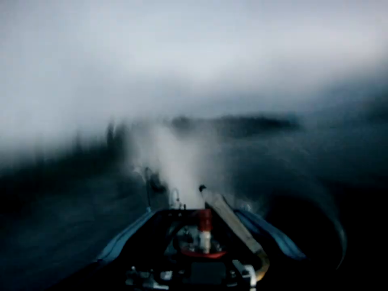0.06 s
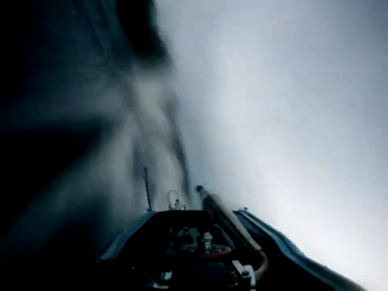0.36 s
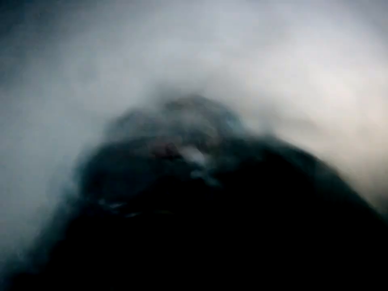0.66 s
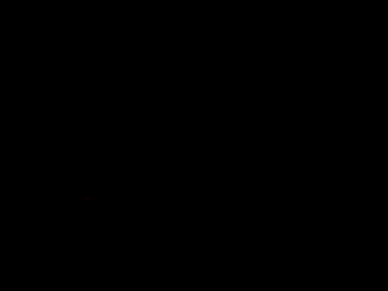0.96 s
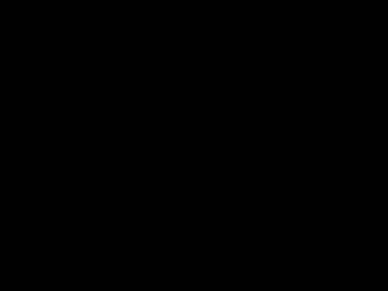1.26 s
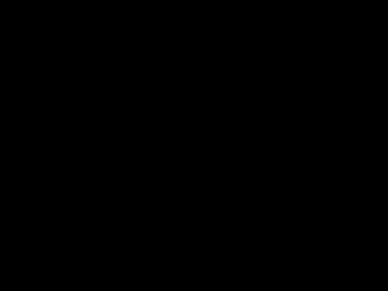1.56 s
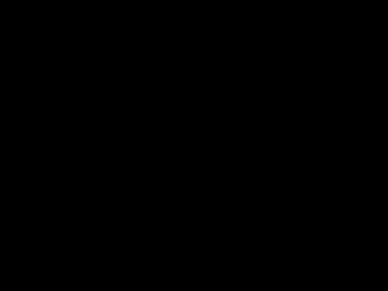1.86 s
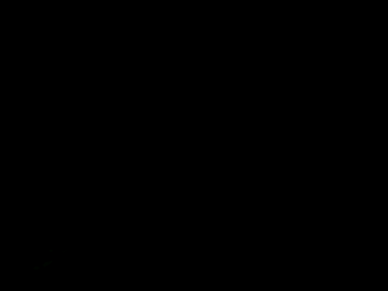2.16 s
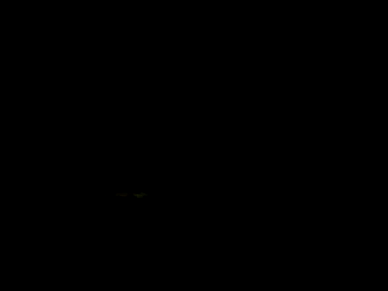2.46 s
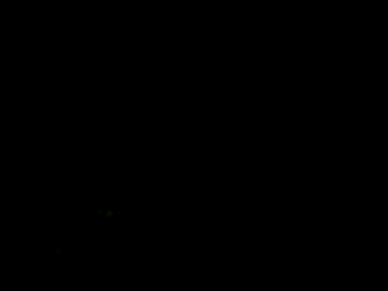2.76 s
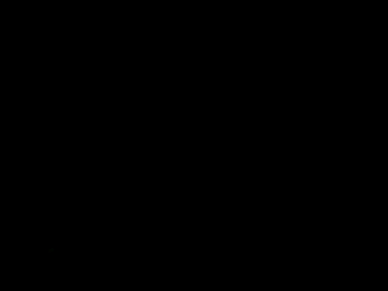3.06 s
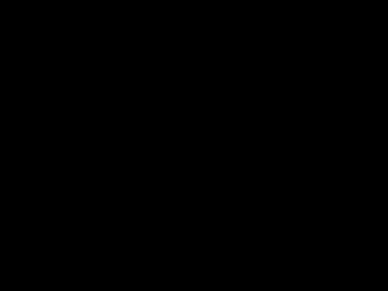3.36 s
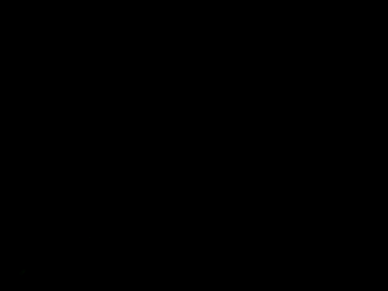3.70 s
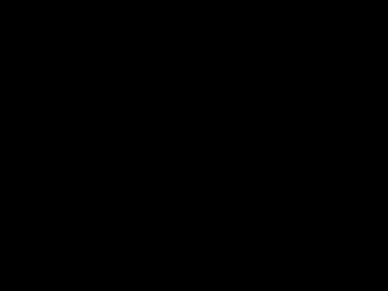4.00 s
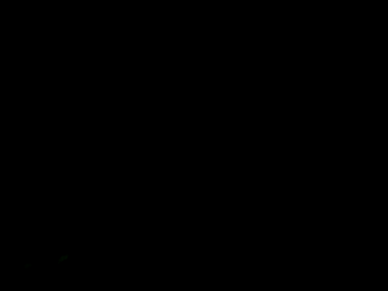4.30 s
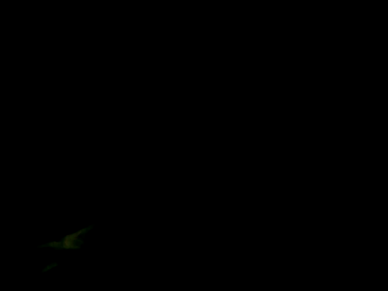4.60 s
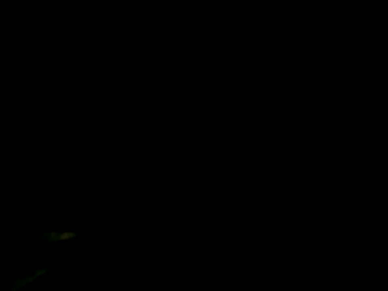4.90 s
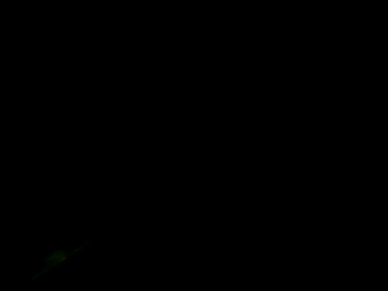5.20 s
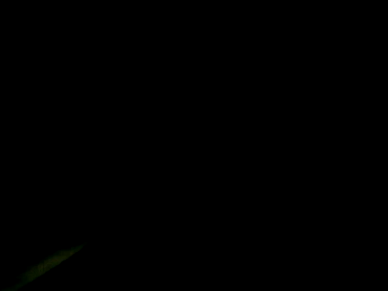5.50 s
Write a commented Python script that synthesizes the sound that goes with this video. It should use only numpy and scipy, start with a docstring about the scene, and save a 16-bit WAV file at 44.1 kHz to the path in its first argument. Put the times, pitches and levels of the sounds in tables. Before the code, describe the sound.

A racing boat's engine screams at full throttle, rising in pitch, heard from a camera in a sealed case on deck. After half a second the boat plunges and the engine is smothered and runs down. Water slaps and cracks against the case over a rumbling, fizzing rush. Under water, a hollow cloud of bubbles swells and fades, thinning to faint single gulps and a few tiny ticks.

```python
"""A racing boat's engine screams at full throttle, heard by a camera in a sealed case on deck.
Its firing pulses bark through the exhaust pipe until the boat trips and plunges: the hull slams down
and the revs die as water floods over it. Under water a cloud of air churns, hums and fizzes,
then thins out to single gulps and slow wobbles of trapped air."""
import sys
import numpy as np
from scipy import signal
from scipy.fft import rfft, irfft, next_fast_len
from scipy.io import wavfile

SR = 44100
rng = np.random.default_rng(int(sys.argv[2]) if len(sys.argv) > 2 else 0)


def inscribe(sig):
    """Save sig as 16-bit PCM at rate SR to the path in sys.argv[1].

    A 1-D sig is mono; a 2-D sig holds one channel per row.
    Samples are clipped to [-1, 1] before scaling.
    """
    pcm = np.round(np.clip(np.atleast_2d(sig).T, -1, 1) * 32767)
    wavfile.write(sys.argv[1], SR, pcm.astype(np.int16))


N = 249165
TIME = np.arange(N) / SR

# tone colour of the exhaust pipe: f/Hz, level/dB
PIPE_EQ = [(80, 5), (170, -4.5), (275, 0), (310, -12), (355, 4), (550, -2), (720, 2), (850, 2), (1070, 2),
           (1400, -6.5), (1750, -8), (2100, -11), (2500, -24.5), (2900, -29), (3600, -30), (5000, -46.5)]
def engine(jitter=.048, flutter_db=7, half_order_db=-17, harmonics=16):
    """Firing pulses ring through the pipe; uneven firings smear the overtones and puff out rasp."""
    hz, db, rough, bright = throttle()
    firings = np.cumsum(hz * (1 + jitter * rough * wander(140))) / SR
    running = hz > 24
    phase = 2 * np.pi * firings[running]
    tone, power, flutter = np.zeros(N), np.zeros(N), wander(23.54)
    for k in range(1, harmonics + 1):
        flicker = flutter_db * rough[running] * np.roll(flutter, k * N // harmonics)[running]
        level = gain_of(eq_at(PIPE_EQ, k * hz[running]) + bright[running] * np.log2(k / 3) + flicker)
        overtone = np.cos(k * phase + np.pi * k * k / 4)  # the pipe spreads each pulse in time
        growl = gain_of(half_order_db) * np.cos((k - .5) * phase + k * k)  # strong, weak firings by turns
        tone[running] += level * (overtone + growl)
        power[running] += level ** 2 / 2
    scream = tone / np.sqrt(power + 1e-12) * np.sqrt(1 - np.clip(rough, 0, .95) ** 2)
    puffs = (.69 + np.exp(-(firings % 1) / .27)) * rng.standard_normal(N)
    rasp = coloured(puffs, [(100, -19.5), (300, -5), (550, -2.5), (1100, .5), (1700, 3.5), (2200, -6.5),
                            (2800, -20.5), (3600, -25), (5500, -28)])
    return running * gain_of(db) * (scream + rough * rasp)


# firing rate at full throttle, climbing as the propeller leaves the water: t/s, f/Hz
FIRING_RATE = [(0.0, 265.7), (0.054, 270), (0.102, 288.4), (0.162, 273.6), (0.22, 274.9), (0.258, 296.5),
               (0.366, 335.1), (0.43, 355.7), (0.525, 357.7)]
# wave crests that make the exhaust bark: t/s, boost/dB, added roughness
WAVE_CRESTS = [(0.102, 2.5, 0.026), (0.249, 3.5, -0.14), (.378, 2.5, 0.22), (0.426, 3.5, -0.13)]
def throttle(plunge_s=.522, smother_s=.025, run_down_s=.78, stall_hz=96, crest_s=.017):
    """Engine pitch, level, roughness and brightness: it clears as it races, then drowns and runs down."""
    since = np.maximum(TIME - plunge_s, 0)
    hz = curves(FIRING_RATE)[0] * np.cos(np.pi / 2 * np.minimum(since / run_down_s, 1)) ** 2
    under = np.minimum(since / smother_s, 1)

    def morph(biting, free, drowned):
        """Blends from propeller biting to spinning free, then to the smothered exhaust."""
        return (1 - under) * np.interp(hz, [273, 359], [biting, free]) + under * drowned

    db = morph(-14.5, -13.5, -24)
    rough = morph(.46, .31, .37)
    bright = morph(.85, 3.5, -3.2)  # dB per octave
    for s, boost_db, added_rough in WAVE_CRESTS:
        crest = np.exp(-((TIME - s) / crest_s) ** 2)
        db += boost_db * crest
        rough += added_rough * crest
    stall_db = 40 * np.log10(np.clip(hz / stall_hz, .01, 1))
    return hz, db + stall_db, rough, bright


# water and hull striking the case: t/s, level/dB, ring f/Hz, crack send/dB, t60/s
HULL_HITS = [(0.5648, 2, 2088, -5.5, 0.023), (0.5759, 0, 2150, -9.5, .042),
             (0.599, -4.5, 1444, -18.5, 0.036), (0.6748, -1.5, 2050, -8.5, .035),
             (.6822, -6.5, 962, -33, .03), (0.814, -7, 1170, -7, .03), (0.9217, -2, 2019, -2, 0.012),
             (1.0134, -17.5, 2130, 1, 0.049), (1.2668, -5.5, 1380, -43, 0.042),
             (1.303, -5.5, 1135, -33, 0.02), (1.3345, -2.5, 1250, -40, 0.014),
             (1.3708, -5.5, 2150, -7, 0.036), (1.392, -0.5, 1874, -2.5, 0.015),
             (1.4268, 7, 2043, -23.5, .015), (1.5438, -9.5, 1590, -1.5, 0.077),
             (1.5851, -12, 2103, -10, 0.087), (1.6361, -5.5, 2140, -26, 0.021),
             (1.6635, -12, 1960, -11, 0.05), (1.6939, -2.5, 1477, -6.5, .055),
             (2.383, -20, 1270, -23, 0.047), (2.428, -21.5, 1240, -45, 0.054),
             (2.8154, -14.5, 2126, -47, 0.03), (3.8497, -28, 1670, -35, 0.02),
             (4.6178, -25, 1890, -29, 0.016), (4.6516, -36.5, 1480, -12, 0.022),
             (4.8492, -36.5, 2040, -31, 0.018)]
def slaps(spray_db=-1, crack_db=5):
    """Each hit layers a sharp crack, a puff of spray and a short ring of squeezed air."""
    out, t = np.zeros(N), np.arange(4096) / SR
    spray_eq = [(150, -5), (500, -5.5), (1200, -2.5), (2200, -.5), (3000, -23), (5500, -26.5), (7000, -46)]
    crack_eq = [(1500, -31), (2800, -3), (3700, 20.5), (4600, -.5), (5500, -7), (7000, -42)]
    for s, db, hz, send_db, t60 in HULL_HITS:
        ring_db = -9.5 - .01 * send_db  # a softer crack traps more air and rings a little more
        air = gain_of(ring_db) * bubble(t, hz, t60, rise_s=.0033, glide=.28)
        spray = gain_of(spray_db) * burst(t, spray_eq, t60, rise_s=.0011)
        crack = gain_of(send_db + crack_db) * burst(t, crack_eq, .42 * t60, rise_s=.0006)
        add(out, s, gain_of(db) * (air + spray + crack))
    return out


# faders for the water rushing over the case: t/s, rumble/dB, churn/dB, fizz/dB
RUSH_FADERS = [(.55, -36.5, -18, -17), (.62, -28.5, -21.5, -33), (.71, -21.5, -21, -31),
               (.88, -54.5, -33, -28), (1.01, -17.5, -20.5, -23), (1.14, -37.5, -31, -31.5),
               (1.36, -40, -23.5, -26), (1.6, -31, -23.5, -32), (1.77, -30.5, -27.5, -44.5)]
# spray turning to separate bubbles, then blurring again: t/s, share of smooth hiss/0-1
FIZZ_BLUR = [(.55, 0.85), (1.15, 0.59), (1.3, 0.55), (1.7, 0.31), (2.0, 0.8), (3.5, 0.56)]
# low rumble of the flood: f/Hz, level/dB
RUMBLE_EQ = [(10, -9.5), (28, -2), (50, 4.5), (80, -7.5), (120, -7), (220, -28), (500, -69.5)]
# big bubbles near the surface: f/Hz, level/dB
CHURN_NEAR_EQ = [(60, -24), (130, -5.5), (250, -2), (350, -4.5), (500, -2.5), (700, -8.5), (950, -9.5),
                 (1400, -19), (3000, -65)]
# big bubbles at depth, more hollow: f/Hz, level/dB
CHURN_DEEP_EQ = [(60, -37), (130, -8.5), (200, 1.5), (260, -7), (380, -6), (520, 1), (590, -3.5), (670, 0),
                 (800, -9), (950, -30), (1400, -4.5), (3000, -61)]
# small bubbles near the surface: f/Hz, level/dB
FIZZ_NEAR_EQ = [(500, -24), (950, -9.5), (1300, -1.5), (1700, -2), (2150, 2), (2600, -6.5), (3100, -8),
                (3600, -7), (4300, -22), (5500, -14.5), (7000, -39)]
# small bubbles at depth, darker: f/Hz, level/dB
FIZZ_DEEP_EQ = [(500, -13), (950, -4.5), (1300, 4), (1700, -1), (2150, 2.5), (2600, -12), (3100, -12.5),
                (3600, -9.5), (4300, -20), (5300, -19.5), (7000, -44)]
def water(rumble_trim_db=2, fizz_trim_db=1, wind_db=-32.5):
    """Wind on the case, then a rush of bubbles that sinks into a hollow murmur."""
    rumble_db, churn_db, fizz_db = curves(RUSH_FADERS)
    rumble_db = settle(rumble_db, fall=33, murmur_db=-54.5, murmur_fall=2.4) + rumble_trim_db
    churn_db = settle(churn_db, fall=20.6, murmur_db=-51, murmur_fall=2.8)
    fizz_db = settle(fizz_db, fall=14, murmur_db=-55, murmur_fall=3.97) + fizz_trim_db
    wet = np.interp(TIME, [.525, .565], [0, 1]) ** 2
    depth = np.clip((TIME - 1.8) / .5, 0, 1)
    near, deep = np.sqrt(1 - depth), np.sqrt(depth)
    surge_db = 1.98 * (1 - depth / 2) * wander(63)  # bubbles come in clumps
    rumble = coloured(rng.standard_normal(N), RUMBLE_EQ)
    rumble *= wet * gain_of(rumble_db) + (1 - wet) * gain_of(wind_db)
    big = swarm(110, 1200, per_s=1100, cycles=25.3, spread_db=4) + .93 * rng.standard_normal(N)
    churn = near * coloured(big, CHURN_NEAR_EQ) + deep * coloured(big, CHURN_DEEP_EQ)
    small = swarm(800, 5500, per_s=2200, cycles=17, spread_db=11.5)
    blur = curves(FIZZ_BLUR)[0]  # the tiniest bubbles merge into hiss
    small = np.sqrt(1 - blur) * small + np.sqrt(blur) * 2 * rng.standard_normal(N)
    fizz = near * coloured(small, FIZZ_NEAR_EQ) + deep * coloured(small, FIZZ_DEEP_EQ)
    return rumble + wet * (gain_of(churn_db + surge_db / 2) * churn + gain_of(fizz_db + surge_db) * fizz)


def settle(rush_db, fall, murmur_db, murmur_fall):
    """A water layer's level in dB: once sunk, the rush dies to a long murmur. Falls are in dB/s."""
    since = np.maximum(TIME - RUSH_FADERS[-1][0], 0)
    rush = gain_of(rush_db - fall * since)
    murmur = gain_of(murmur_db - murmur_fall * since)
    return 20 * np.log10(np.hypot(rush, murmur))


def cloud(peak_s=1.655, swell_s=.17, db=-20.5, fall_db_per_s=24.5, first_hz=345, last_hz=674):
    """The freed air hums as one cloud: it swells, then fades and climbs in pitch as it shrinks."""
    before, since = np.maximum(peak_s - TIME, 0), np.maximum(TIME - peak_s, 0)
    hz = last_hz + (first_hz - last_hz) * np.exp(-(since / .4) ** 2)
    level = np.exp(-(before / swell_s) ** 2) * gain_of(db - fall_db_per_s * since)
    bubbles = swarm(300, 900, per_s=870, cycles=20, spread_db=2.5, count=12)
    return level * resonate(bubbles, hz, width_hz=130)


# large bubbles breaking free: t/s, level/dB, f/Hz, splash send/dB
BIG_BUBBLES = [(1.029, -12, 461, -13), (1.513, -5.5, 465, -24), (1.555, -5.5, 408, -11),
               (1.62, -8.5, 487, 0), (1.641, -10, 346, -22), (1.658, -2, 470, -20), (1.668, -4, 276, -24),
               (1.769, -7, 340, -1), (1.969, -10, 517, -23), (2.008, -13, 414, -0.5),
               (2.099, -13.5, 556, -1), (2.152, -18, 299, -22), (2.16, -15.5, 770, -20),
               (2.265, -17, 628, -5), (2.384, -10.5, 650, -23), (2.531, -12.5, 477, -9),
               (2.537, -12, 730, -31), (2.617, -28.5, 656, -21), (2.696, -28, 527, 4.5),
               (2.816, -25, 625, 8), (2.853, -25, 344, -18), (2.974, -19, 523, -1.5),
               (3.206, -25.5, 624, -5.5), (3.221, -27, 657, -21), (3.482, -30, 443, -3),
               (3.745, -34.5, 517, -15), (3.816, -30.5, 347, -25), (3.848, -29.5, 480, 0),
               (3.935, -29, 613, -23), (3.955, -27, 468, -18), (4.184, -36, 487, 5),
               (4.49, -36.5, 529, -20), (4.718, -29, 474, -2), (4.784, -33, 493, 2),
               (4.928, -34.5, 600, -6), (5.279, -36.5, 571, -1.5), (5.34, -32, 613, -21)]
def gulps(ring_db=-5, slosh_db=-7, splash_db=1, cycles=24):
    """Large bubbles ring as they pinch off, in a slosh of smaller ones."""
    out, t = np.zeros(N), np.arange(6144) / SR
    slosh_eq = [(80, -20.5), (200, 7), (310, 17.5), (500, 6.5), (800, 6.5), (1300, -2), (3000, -66.5)]
    splash_eq = [(500, -22.5), (1000, -3), (1400, -1.5), (2100, -12), (2700, -26), (5500, -54)]
    for s, db, hz, send_db in BIG_BUBBLES:
        t60 = cycles / hz
        ring = gain_of(ring_db) * bubble(t, hz, t60, rise_s=.0018, glide=2.7)
        slosh = gain_of(slosh_db) * burst(t, slosh_eq, t60, rise_s=.0021)
        splash = gain_of(send_db + splash_db) * burst(t, splash_eq, t60=.033, rise_s=.0045)
        add(out, s, gain_of(db) * (ring + slosh + splash))
    return out


# pockets of trapped air: t/s, level/dB, starting f/Hz, length/s
AIR_POCKETS = [(0.601, -14, 75.5, 0.042), (0.692, -21, 88, .039), (.895, -17, 202.6, 0.044),
               (0.998, -12.5, 93.2, 0.13), (1.04, -11.5, 198, 0.0353), (1.104, -6, 98, 0.0086),
               (1.108, -18, 41.3, 0.12), (2.888, -31, 164, 0.028), (2.904, -31.5, 53, 0.069),
               (4.177, -40, 64, 0.12), (4.308, -42, 56.1, 0.16), (4.314, -44, 212, 0.025),
               (4.777, -45.5, 70, 0.064)]
def wobbles(sag=.34):
    """Pockets of air throb in the low end and sag in pitch as they spread."""
    out = np.zeros(N)
    for s, db, first_hz, length in AIR_POCKETS:
        progress = np.linspace(0, 1, int(length * SR))
        turns = np.cumsum(first_hz * (1 - sag * progress)) / SR
        swell = np.sin(np.pi * progress ** .7)
        add(out, s, gain_of(db) * swell * np.sin(2 * np.pi * turns))
    return out


# grit striking the case: t/s, level/dB
GRIT_TAPS = [(2.584, -41), (3.079, -41), (4.336, -47), (4.407, -36)]
def grit():
    """Grit taps the case with small, sharp ticks."""
    out, t = np.zeros(N), np.arange(1024) / SR
    tick_eq = [(1500, -34), (3500, 4), (5200, -4), (7000, -16)]
    for s, db in GRIT_TAPS:
        add(out, s, gain_of(db) * burst(t, tick_eq, t60=.016, rise_s=.00026))
    return out


def chirp(s=4.971, db=-58.5):
    """One small bubble whistles upward on its way to the surface."""
    out, t = np.zeros(N), np.arange(4096) / SR
    add(out, s, gain_of(db) * bubble(t, hz=700, t60=.17, rise_s=.025, glide=17))
    return out


def blips(trim_db=-69):
    """Small bubbles brush the sunken case with tiny, muffled blips."""
    sunk = np.interp(TIME, [1.8, 2.2, 3.2, 5.6], [0, 2.5, 1, .45])
    bubbles = swarm(900, 3800, per_s=28, cycles=26, spread_db=2.5, count=14)
    return gain_of(trim_db) * sunk * coloured(bubbles, [(2100, 0), (2800, -7), (4000, -11)])


def hiss(db=-66):
    """A faint, steady bed of hiss."""
    hiss_eq = [(100, 4.5), (2500, -7.5), (5000, -8.5), (7000, -28.5)]
    return gain_of(db) * coloured(rng.standard_normal(N), hiss_eq)


def swarm(low_hz, high_hz, per_s, cycles, spread_db, count=28):
    """Bubbles of many sizes, born at random; a few are much louder."""
    out = np.zeros(N)
    for hz in np.geomspace(low_hz, high_hz, count):
        life = cycles / hz
        t = np.arange(0, life, 1 / SR)
        share = hz * np.log(high_hz / low_hz) / (high_hz - low_hz) / count  # small ones are more common
        born = rng.random(N) < per_s * share / SR
        accent = np.minimum(rng.standard_exponential(N), 3.5)
        triggers = born * gain_of(spread_db * accent)
        ring = np.sqrt(hz) * bubble(t, hz, life, rise_s=1 / hz, glide=.37 / life)
        out += signal.oaconvolve(triggers, ring)[:N]
    return unit_rms(out)


def bubble(t, hz, t60, rise_s, glide):
    """A bubble swells and rings down, its pitch climbing by glide times hz each second."""
    shape = envelope(t, t60, rise_s)
    return shape / shape.max() * np.sin(2 * np.pi * hz * (t + glide * t ** 2 / 2))


def burst(t, eq, t60, rise_s):
    """A short puff of coloured noise with a peak near 1."""
    shape = envelope(t, t60, rise_s)
    puff = shape * coloured(rng.standard_normal(len(t)), eq)
    return puff / np.linalg.norm(puff) * np.linalg.norm(shape) / 2


def envelope(t, t60, rise_s):
    """A rounded attack and an exponential tail."""
    return (1 - np.exp(-(t / rise_s) ** 2)) * gain_of(-60 * t / max(t60, .005))


def resonate(x, hz, width_hz):
    """A swept resonance: shifts the curve hz down to zero, smooths, and shifts back."""
    carrier = np.exp(2j * np.pi * np.cumsum(hz) / SR)
    pole = np.exp(-np.pi * width_hz / SR)
    return unit_rms((carrier * signal.lfilter([1], [1, -2 * pole, pole * pole], x / carrier)).real)


def wander(hz):
    """Smooth random modulation, rolling off above hz."""
    return coloured(rng.standard_normal(N), [(hz, 0), (4 * hz, -60)])


def coloured(x, eq):
    """Runs x through an EQ curve, at rms 1."""
    size = next_fast_len(len(x))
    gains = gain_of(eq_at(eq, np.fft.rfftfreq(size, 1 / SR)))
    return unit_rms(irfft(rfft(x, size) * gains, size)[:len(x)])


def eq_at(eq, hz):
    """Reads an EQ curve in dB on a log-frequency axis."""
    f, db = np.transpose(eq)
    return np.interp(np.log(hz + 1), np.log(f + 1), db)


def curves(rows):
    """One automation curve for each column after the time."""
    s, *columns = np.transpose(rows)
    return [np.interp(TIME, s, c) for c in columns]


def add(mix, s, sound):
    """Lays a sound into the mix at s seconds."""
    part = mix[max(round(s * SR), 0):][:len(sound)]
    part += sound[:len(part)]


def gain_of(db):
    """Decibels to amplitude."""
    return 10 ** (np.asarray(db) / 20)


def unit_rms(x):
    """Scales to rms 1."""
    return x / np.sqrt(np.mean(x ** 2) + 1e-20)


def scene():
    """The mono mix at the microphone in the case."""
    mix = hiss() + engine() + water() + cloud() + slaps() + gulps() + wobbles()
    return (mix + blips() + chirp() + grit())[None]


def record(dry, hold_hz=12000, top_hz=15400):
    """The camera clips, samples slowly and holds each value, mirroring the sound into a glassy treble."""
    narrow = signal.oaconvolve(np.clip(dry[0], -1, 1), signal.firwin(61, 5750, fs=SR), "same")
    samples = signal.resample_poly(narrow, hold_hz, SR)
    held = signal.resample_poly(np.repeat(samples, 16), SR, 16 * hold_hz)[:N]
    high_cut = signal.firwin(201, top_hz, window=("kaiser", 8), fs=SR)
    return signal.oaconvolve(held, high_cut, "same")[None]


dry = scene()
out = record(dry)
inscribe(out)
```